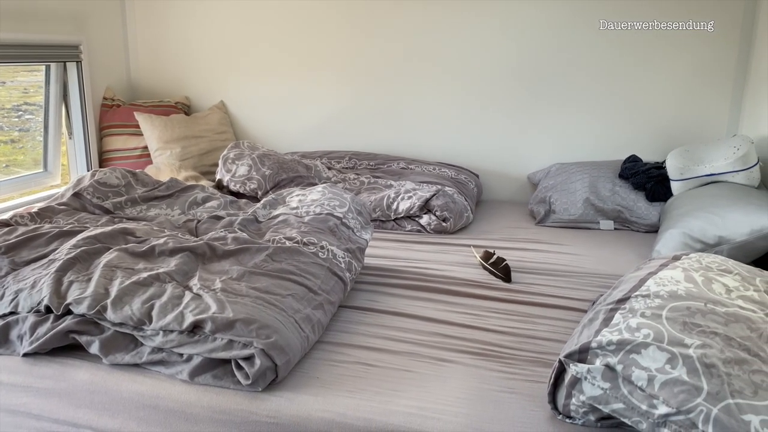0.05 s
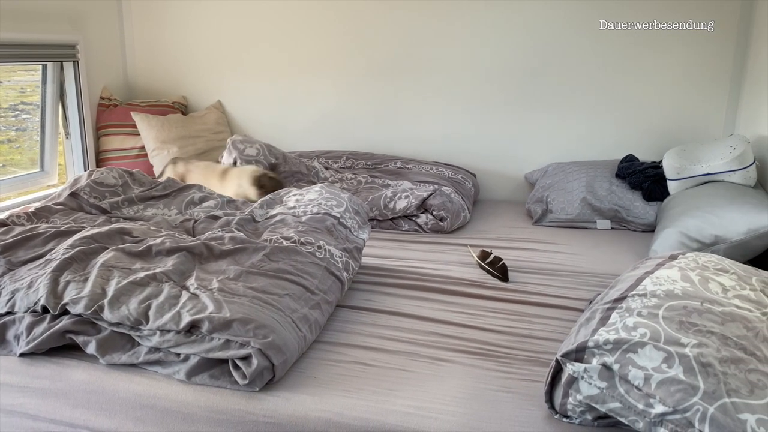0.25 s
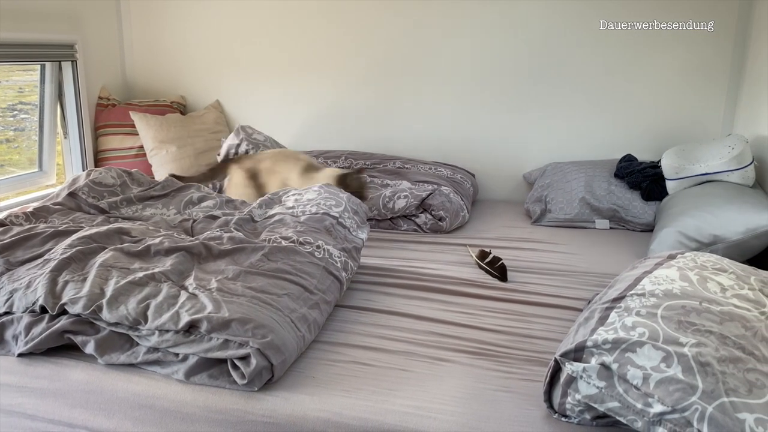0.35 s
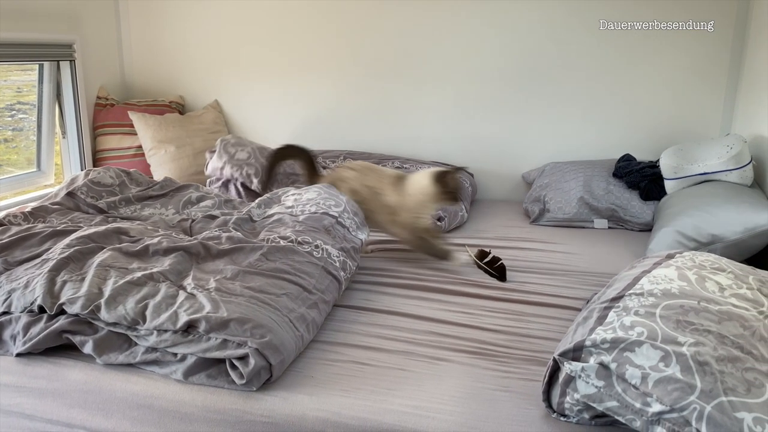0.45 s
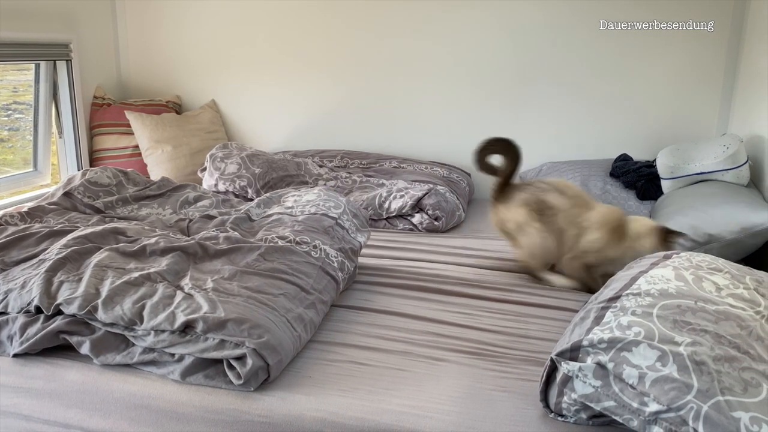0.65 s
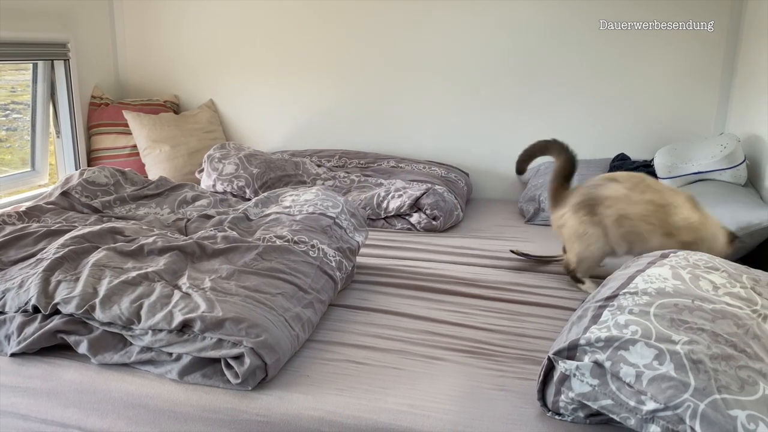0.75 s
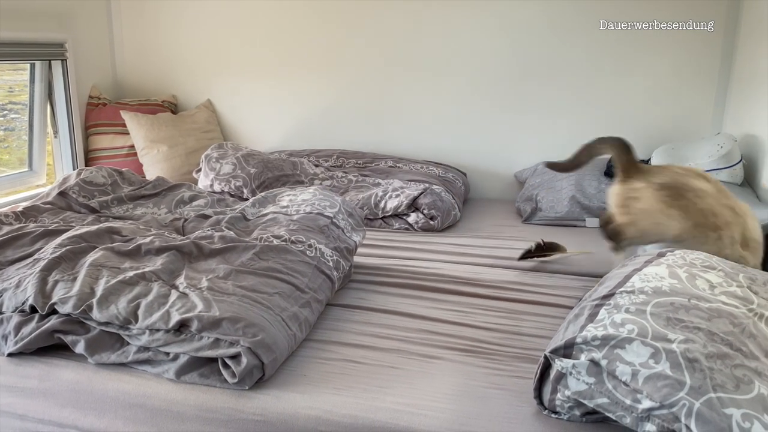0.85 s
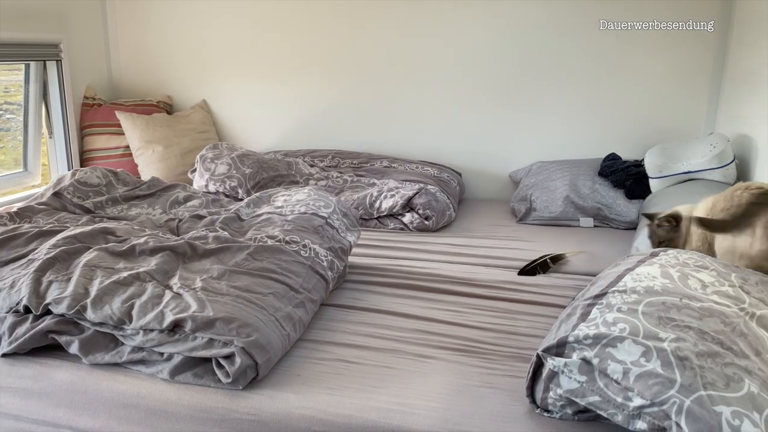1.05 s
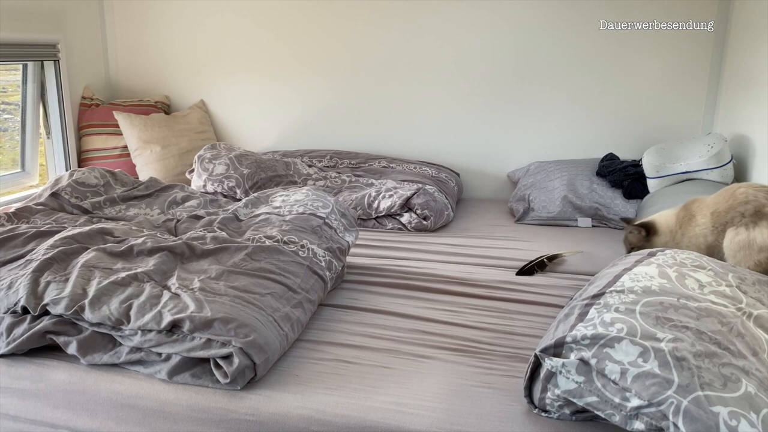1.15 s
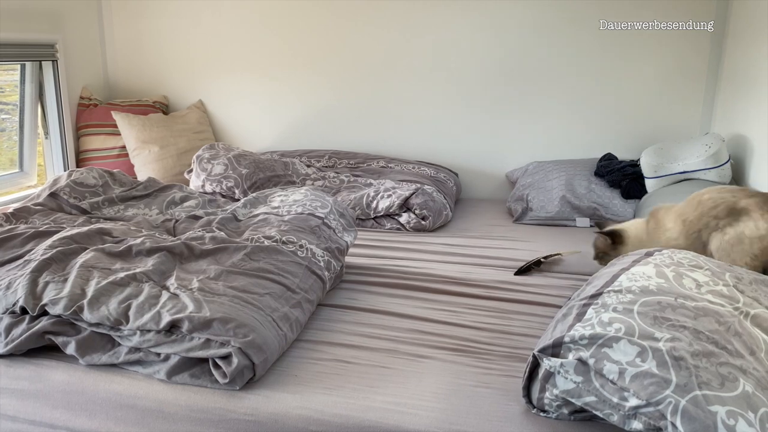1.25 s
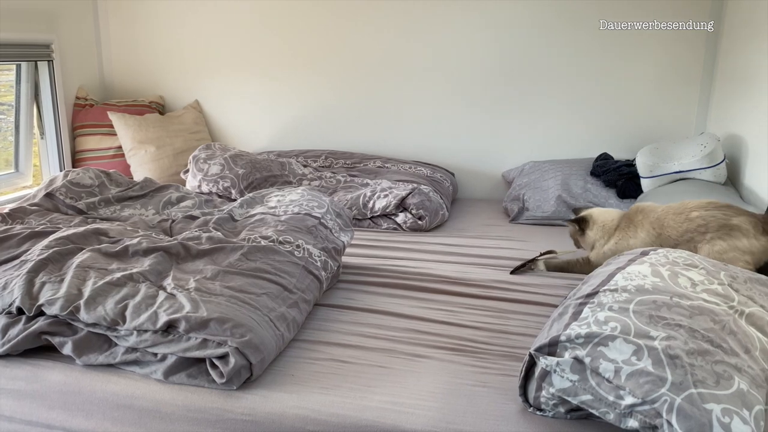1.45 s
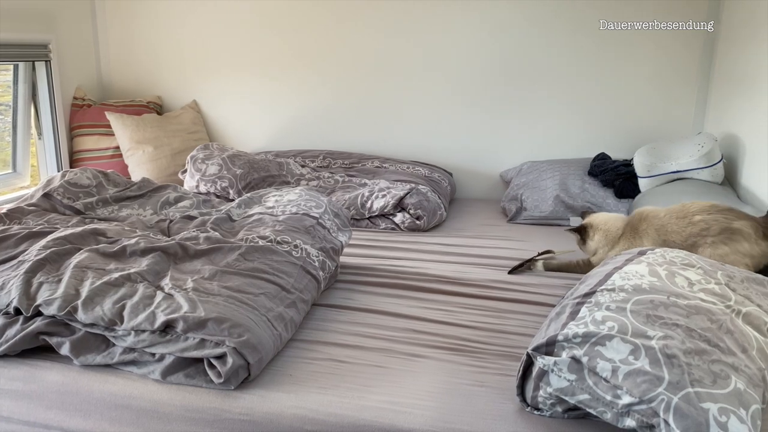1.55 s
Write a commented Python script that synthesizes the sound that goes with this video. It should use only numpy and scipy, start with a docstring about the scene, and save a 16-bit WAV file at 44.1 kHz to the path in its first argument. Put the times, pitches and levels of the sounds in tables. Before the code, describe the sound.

A cat bounds across a bed, its paws thudding softly into the mattress. Claws catch the sheet twice with a sharp rip, harder landings knock in the bed base, and a soft rub precedes the last thumps in a small room.

```python
"""Cat bounding across a bed

A cat bounds out of a duvet, across a mattress, and turns round to crouch, in a small bedroom.
Its paws thud into the mattress, pat the cover and scuff the cloth; hard landings knock in the bed base.
The claws catch in the taut sheet, twice with a sharp rip. Underneath, the bed keeps rocking with
a low rumble and the bedding rustles faintly; the turn is a soft rub on the padding."""
import sys
import numpy as np
from scipy import signal
from scipy.fft import rfft, irfft
from scipy.io import wavfile

SR = 44100
rng = np.random.default_rng(int(sys.argv[2]) if len(sys.argv) > 2 else 0)


def transcribe(u):
    """Save the signal u as a 16-bit wav file named by the first command-line argument.

    u: samples, shape (n,) or (channels, n), limited to [-1, 1]; the rate is SR.
    q: integer samples, one column per channel.
    """
    v = np.clip(np.atleast_2d(u).T, -1, 1)
    q = np.round(v * 32767).astype(np.int16)
    wavfile.write(sys.argv[1], SR, q)


N = 70560
TIME = np.arange(N) / SR
LEFT_LAG_S = 0.00014  # snaps and knocks reach the left side this much later

# Spectra set tone colour only: their levels are relative, per Hz.
# room tone: f/Hz, level/dB
AIR_SPECTRUM = [(250, 0), (500, -8), (1000, -15), (2200, -17), (4000, -22), (6400, -23), (8000, -30),
                (13000, -33), (15300, -28)]
# rumble of the rocking bed: f/Hz, level/dB
ROCKING_SPECTRUM = [(15, -69), (28, -34), (40, -19.5), (55, -2.5), (80, 2), (110, -6.5), (160, -12.5),
                    (250, -17), (420, -28.5), (900, -30.5), (3000, -52.5)]
# fader ride on that rumble: t/s, level/dB
ROCKING_LEVELS = [(0, -67.5), (.14, -60.5), (.2, -51), (.22, -52), (.34, -58), (.45, -47), (.6, -49),
                  (.85, -53.5), (1.0, -56), (1.09, -65), (1.17, -47.5), (1.43, -56), (1.48, -69.5),
                  (1.6, -66)]
# fur against bedding: f/Hz, level/dB
RUSTLE_SPECTRUM = [(200, 41.5), (700, -5), (1400, 16), (2400, -39), (4000, -4), (6500, -25), (8500, -16),
                   (13000, -35), (15300, 17.5)]
# claws pluck the taut sheet: t/s, level/dB, f/Hz, t60/s
SHEET_SNAPS = [(0.4120, -35, 1960, 0.027), (0.4121, -42, 1620, 0.011), (0.4123, -39.5, 1264, 0.038),
               (0.488, -48, 2400, 0.025), (0.5145, -47.5, 1350, 0.033), (0.5175, -48.5, 2260, 0.029)]
# claws catch and tear free: t/s, level/dB, hold/s, t60/s
CLAW_RIPS = [(0.0614, -67, 0.0026, 0.15), (0.4109, -41.5, 0.0017, 0.0064), (0.4142, -37.5, 0.0034, 0.054),
             (0.44, -56.5, 0.046, 0.36), (0.5137, -36.5, 0.0034, 0.043), (0.5148, -38, 0.00012, 0.0027),
             (0.612, -64.5, 0.022, 0.053), (0.79, -73, 0.0036, 0.04), (0.875, -79, 0.0031, 0.044)]
# threads slipping off the claws: f/Hz, level/dB
RIP_SPECTRUM = [(400, 9), (1200, -6.5), (2200, 3.5), (3000, -2), (4000, 3.5), (5100, -6.5), (6400, 2),
                (7700, -6.5), (10500, -6), (13000, -9), (15200, 1)]
# paw falls: t/s, thud level/dB, contact/s, pat level/dB, pat f/Hz
PAW_FALLS = [(0.064, -63, 0.0057, -66.5, 302), (0.147, -54, 0.0034, -54, 276),
             (0.165, -51.5, 0.0026, -54, 245), (0.191, -60.5, 0.0025, -73, 244),
             (0.224, -50, 0.045, -63, 263), (0.249, -66.5, 0.0015, -62, 272), (0.3, -43, 0.01, -68, 273),
             (0.344, -54, 0.0038, -55.5, 714), (0.358, -47.5, 0.0028, -46.5, 296),
             (0.384, -40.5, 0.0059, -76, 292), (0.414, -38.5, 0.00408, -52, 253),
             (0.443, -40.5, 0.0079, -69, 278), (0.518, -29, 0.00375, -47.5, 548),
             (0.573, -31.5, 0.0077, -66, 285), (0.621, -43, 0.0053, -47, 730),
             (0.632, -35.5, 0.0039, -51.5, 303), (0.661, -60, 0.0029, -62, 436),
             (0.708, -35, 0.0054, -52.5, 273), (0.761, -34.5, 0.0046, -44.5, 288),
             (0.78, -34.5, 0.0037, -55, 425), (0.799, -40, 0.00454, -50, 384),
             (0.874, -46.5, 0.0051, -62, 914), (0.903, -50.5, 0.0027, -69, 278),
             (0.935, -44, 0.0053, -56.5, 570), (1.004, -52.5, 0.0018, -59, 270),
             (1.108, -39.5, 0.0038, -46.5, 282), (1.115, -32.5, 0.00449, -50.5, 780),
             (1.142, -43, 0.0044, -49, 288), (1.32, -45.5, .004, -58, 610), (1.397, -46, 0.0095, -106, 302)]
# modes of the mattress on its frame: f/Hz, level/dB, t60/s
MATTRESS_MODES = [(86, -3.5, 0.16), (181, -11, 0.089), (247, -11, 0.085), (316, -3, 0.079)]
# paws skid on the cloth: t/s, level/dB, attack/s, hold/s, tilt/(dB per octave)
PAW_SKIDS = [(0.125, -67.5, 0.0069, 0.0076, -15), (0.142, -59, 0.005, 0.0087, -13),
             (0.213, -71.5, .012, 0.045, -4.5), (0.34, -74, 0.0037, 0.034, -4.5),
             (0.386, -70, .004, .012, 0), (0.42, -58, .002, .02, 1), (0.516, -55, .001, .006, 2),
             (0.613, -57, .013, 0.0056, -15), (0.662, -67.5, 0.0025, 0.0044, -12),
             (0.753, -60.5, 0.009, 0.0035, -10.5), (0.795, -62.5, 0.0055, 0.0062, -6.5),
             (0.873, -70.5, .003, 0.012, 0), (1.118, -69, .004, .003, -9), ]
# cloth brushed by a paw, before the tilt: f/Hz, level/dB
SCUFF_SPECTRUM = [(300, -46), (900, -13), (1500, -3.5), (2400, 6), (3400, 1), (6300, -1), (8500, -19),
                  (15000, -50)]
# hollow notes of the bed base: t/s, level/dB, f/Hz, t60/s
BASE_KNOCKS = [(0.415, -53, 278, 0.11), (0.4155, -34, 175, 0.036), (0.5205, -42, 496.5, 0.14),
               (0.522, -42, 557, 0.085), (0.5225, -41, 366, 0.11), (0.532, -51.5, 686, 0.039),
               (0.7615, -44, 248, 0.063), (0.763, -42.5, 175, 0.07), (1.119, -37.5, 736, 0.027),
               (1.1215, -38.5, 341, 0.044), (1.124, -46, 240, 0.12), (1.136, -50.5, 617, 0.042)]
# the cat rubbing on the padding: f/Hz, level/dB
SHUFFLE_SPECTRUM = [(110, -45), (170, -1.5), (245, -1), (340, -4.5), (480, -16.5), (680, -12),
                    (1000, -26.5), (1500, -39), (5000, -56)]
# the bedroom's decay: f/Hz, t60/s
ROOM_DECAY = [(100, 0.18), (300, 0.12), (1200, 0.26), (4000, 0.29), (8000, 0.18), (15000, 0.074)]
# stereo image of the noises: f/Hz, left-right correlation (0 wide, 1 mono)
STEREO_LIKENESS = [(60, .98), (130, .8), (260, .35), (600, .2), (4000, .05), (8000, .1), (11500, .97)]
# colour difference between the microphones: f/Hz, left minus right level/dB
MIC_COLOUR = [(80, 0), (170, 4), (380, -3), (550, 2), (750, -1), (1100, 5.5), (1600, 11), (2400, 7.5),
              (3400, -4.5), (5800, -8.5), (10000, 1.5), (14000, -1.5)]


def from_db(db):
    """Decibels to gain."""
    return 10 ** (np.asarray(db) / 20)


def rms_one(x):
    """Scale to an rms of 1."""
    return x / np.sqrt(np.mean(x ** 2) + 1e-20)


def at_hz(points, hz):
    """Read a table on a log-frequency axis."""
    freqs, values = np.transpose(points)
    return np.interp(np.log(np.maximum(hz, 1)), np.log(freqs), values)


def envelope(start, attack, hold, t60):
    """Linear rise, hold, exponential release; times in seconds."""
    t = TIME - start
    rise = np.clip(t / max(attack, 1e-4), 0, 1)
    return rise * from_db(-60 * np.maximum(t - attack - hold, 0) / t60)


def band(x, low_hz, high_hz):
    """Band-pass."""
    return signal.sosfilt(signal.butter(2, [low_hz, high_hz], "band", fs=SR, output="sos"), x)


def ring(x, hz, t60):
    """One mode: a unit click sets off a dying sine of height 1."""
    radius, angle = from_db(-60 / (t60 * SR)), 2 * np.pi * hz / SR
    return signal.lfilter([0, np.sin(angle)], [1, -2 * radius * np.cos(angle), radius ** 2], x + 1e-18)


def stereo(pair, spectrum):
    """Spread two unrelated signals as mid and side, then EQ them to the spectrum; rms 1."""
    hz = np.arange(N // 2 + 1) * SR / N
    alike = at_hz(STEREO_LIKENESS, hz)
    mid, side = rfft(pair)
    left_right = np.sqrt(1 + alike) * mid + np.sqrt(1 - alike) * side * np.array([[1], [-1]])
    return rms_one(irfft(left_right * from_db(at_hz(spectrum, hz)), N))


def noise(spectrum=((1, 0), (2, 0))):
    """Smooth stereo noise, white unless a spectrum is given."""
    return stereo(rng.standard_normal((2, N)), spectrum)


def threads(spectrum, slips_per_s=9000, spread_db=2):
    """The grain of cloth: dense tiny slips of thread, uneven in size."""
    sizes = from_db(spread_db * np.minimum(rng.exponential(1, N), 4))
    grains = rng.standard_normal((2, N)) * sizes
    slipping = rng.random(N) < slips_per_s / SR
    return stereo(grains * slipping, spectrum)


def room_tone():
    """The still air of the room, a faint steady hush."""
    return from_db(-72) * rms_one(band(noise(AIR_SPECTRUM), low_hz=140, high_hz=21000))


def bed_rocking():
    """The bed rumbles under the cat's moving weight."""
    level_db = np.interp(TIME, *np.transpose(ROCKING_LEVELS))
    return from_db(level_db) * noise(ROCKING_SPECTRUM)


def bedding_rustle():
    """Fur and bedding brush together during the run."""
    run = envelope(start=0.06, attack=0.017, hold=0.84, t60=0.18)
    return from_db(-69) * run * threads(RUSTLE_SPECTRUM)


def claw_catches():
    """Threads rip off the claws, and the hooked sheet snaps with a short ring."""
    tearing = sum(from_db(db) * envelope(start, attack=0.0022, hold=hold, t60=t60)
                  for start, db, hold, t60 in CLAW_RIPS)
    snaps = np.zeros((2, N))
    for channel, lag in enumerate((LEFT_LAG_S, 0)):
        for start, db, hz, t60 in SHEET_SNAPS:
            pluck = signal.unit_impulse(N, int((start + lag) * SR))
            snaps[channel] += from_db(db) * ring(pluck, hz, t60)
    return tearing * threads(RIP_SPECTRUM) + snaps


def paw_thuds():
    """Each paw's soft half-sine push rings the mattress modes, layered with the bounce of the dent."""
    force = np.zeros(N)
    for start, db, contact, *_ in PAW_FALLS:
        push = np.sin(np.pi * np.clip((TIME - start) / contact, 0, 1))
        force += from_db(db) * push / push.sum()
    modes = sum(from_db(db) * ring(force, hz, t60) for hz, db, t60 in MATTRESS_MODES)
    return band(modes + mattress_bounces(), low_hz=54.3, high_hz=770)


def mattress_bounces(rest_hz=76, cycles_per_contact=0.669, relax_s=0.0288, trim_db=-3):
    """A quicker paw starts the bounce higher; the pitch glides to rest as the dent relaxes."""
    bounces = np.zeros(N)
    for start, db, contact, *_ in PAW_FALLS:
        t = np.maximum(TIME - start, 0)
        bend_hz = cycles_per_contact / contact - rest_hz
        cycles = rest_hz * t + bend_hz * relax_s * (1 - np.exp(-t / relax_s))
        shape = envelope(start, attack=0.0057, hold=0.0048, t60=0.12)
        bounces += from_db(db + trim_db) * shape * np.sin(2 * np.pi * cycles)
    return bounces


def cover_pats(low_hz=166, top_hz=1050):
    """The padded cover gives a short hollow puff, pitched by where the paw lands."""
    puff = band(band(noise(), low_hz, top_hz), low_hz, top_hz)  # twice for steeper slopes
    pats = np.zeros((2, N))
    for start, _, _, db, hz in PAW_FALLS:
        hollow = signal.lfilter(*signal.iirpeak(hz, Q=4.23, fs=SR), puff)
        pats += from_db(db) * envelope(start, attack=0.0045, hold=0.0011, t60=0.081) * rms_one(hollow)
    return pats


def cloth_scuffs():
    """Paws skid on the cloth: dull when they sink in, bright when they graze it."""
    scuffs = np.zeros((2, N))
    for start, db, attack, hold, tilt in PAW_SKIDS:
        tilted = [(hz, level + tilt * np.log2(hz / 1000)) for hz, level in SCUFF_SPECTRUM]
        scuffs += from_db(db) * envelope(start, attack, hold, t60=0.035) * threads(tilted)
    return scuffs


def base_knocks():
    """Hard landings knock in the bed base; the mattress cushions each attack."""
    t = TIME - np.array([[LEFT_LAG_S], [0]])
    knocks = np.zeros((2, N))
    for start, db, hz, t60 in BASE_KNOCKS:
        shape = envelope(start, attack=0.003, hold=0.00084, t60=t60)
        knocks += from_db(db) * shape * np.sin(2 * np.pi * hz * (t - start))
    return knocks


def turning_shuffle():
    """A soft, unbroken rub on the padding as the cat turns round."""
    turn = envelope(start=0.853, attack=0.048, hold=0.11, t60=0.079)
    return from_db(-58.5) * turn * threads(SHUFFLE_SPECTRUM)


def bedroom_reverb(send):
    """Diffuse reflections build quickly and die away, each octave at its own rate."""
    edges_hz = 40 * 2. ** np.arange(10)
    whites = noise(), noise()  # neighbouring octaves get unrelated noise
    tail = np.zeros((2, N))
    for octave, (low, high) in enumerate(zip(edges_hz, edges_hz[1:])):
        fade = envelope(start=0, attack=0.0059, hold=0, t60=at_hz(ROOM_DECAY, np.sqrt(low * high)))
        tail += band(whites[octave % 2], low, high) * fade / np.sqrt(np.sum(fade ** 2))
    return signal.fftconvolve(send, tail, axes=1)[:, :N]


def microphones(x):
    """Each microphone favours its own frequency ranges."""
    hz = np.arange(N + 1) * SR / (2 * N)
    balance_db = at_hz(MIC_COLOUR, hz)
    gains = from_db([balance_db / 2, -balance_db / 2])
    return irfft(rfft(x, 2 * N) * gains)[:, :N]


def scene():
    """Paws and claws with a little room, soft cloth alongside, rumble and room tone underneath."""
    # each layer with its reverb send in dB
    layers = [(paw_thuds(), -5.5), (base_knocks(), -9.5), (cover_pats(), -11.5),
              (cloth_scuffs(), -6), (claw_catches(), -10.5)]
    direct = sum(sound for sound, _ in layers)
    reverb = bedroom_reverb(sum(from_db(send_db) * sound for sound, send_db in layers))
    air = room_tone()
    cat = microphones(direct + reverb + bedding_rustle() + turning_shuffle())
    return cat + bed_rocking() + air


def record(dry, low_cut_hz=37, high_cut_hz=15900):
    """The small microphones lose the deep bass; the top is cut steeply."""
    thinned = signal.sosfilt(signal.butter(4, low_cut_hz, "high", fs=SR, output="sos"), dry)
    return signal.sosfilt(signal.ellip(10, .2, 70, high_cut_hz, fs=SR, output="sos"), thinned)


dry = scene()
out = record(dry)
transcribe(out)
```